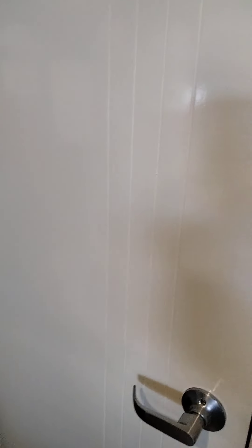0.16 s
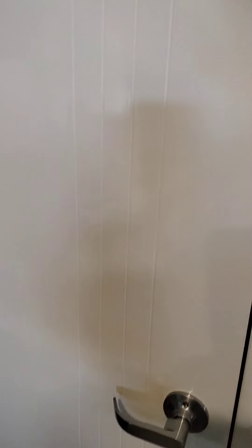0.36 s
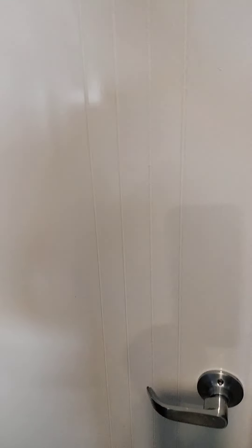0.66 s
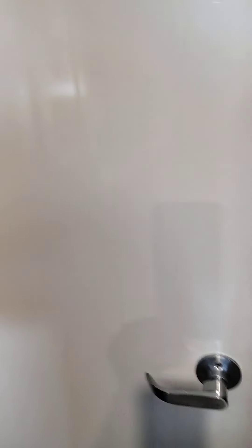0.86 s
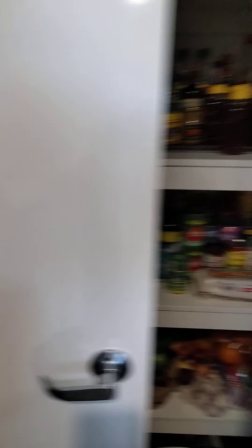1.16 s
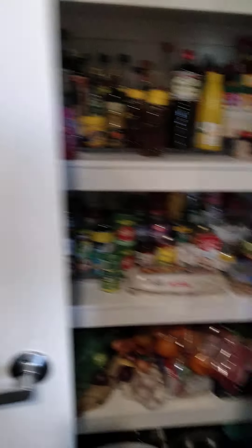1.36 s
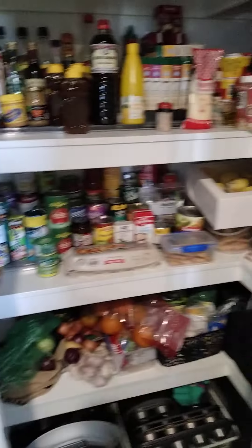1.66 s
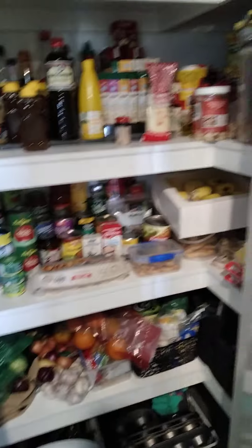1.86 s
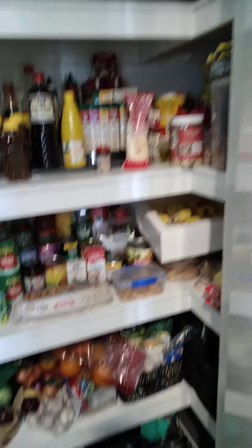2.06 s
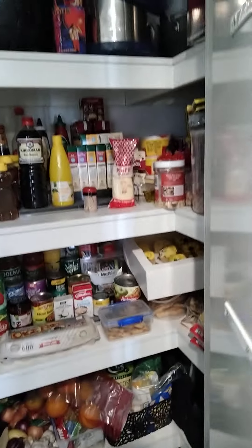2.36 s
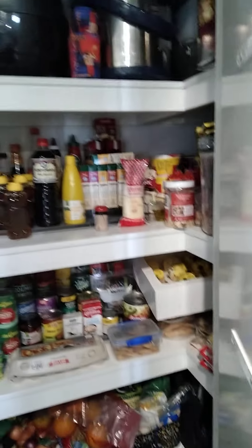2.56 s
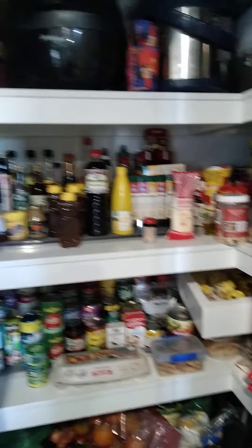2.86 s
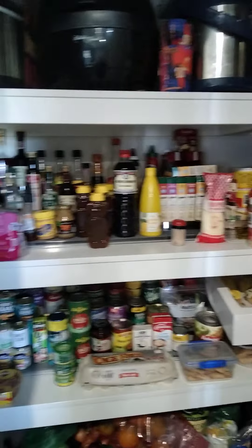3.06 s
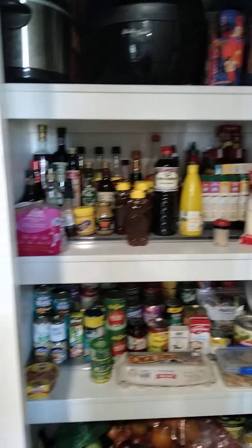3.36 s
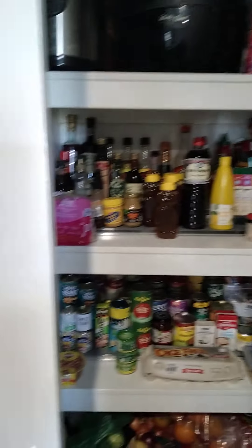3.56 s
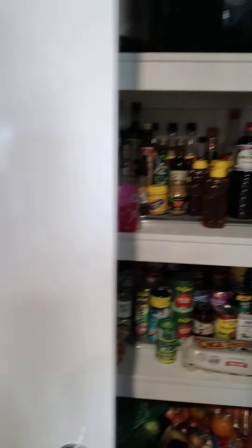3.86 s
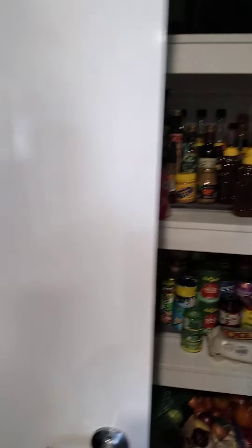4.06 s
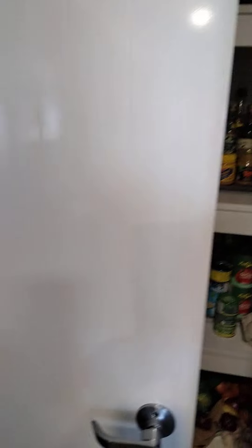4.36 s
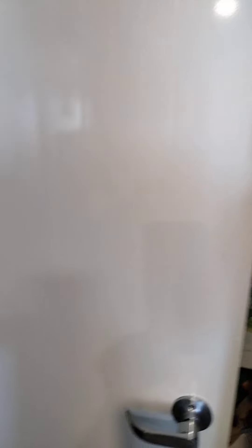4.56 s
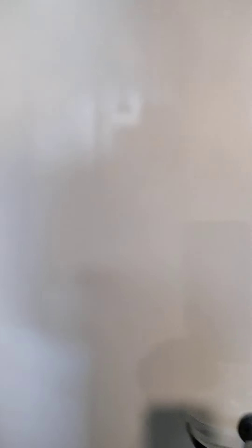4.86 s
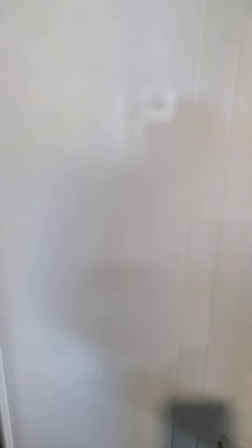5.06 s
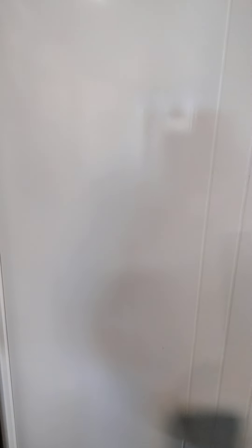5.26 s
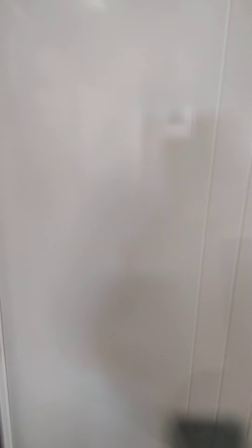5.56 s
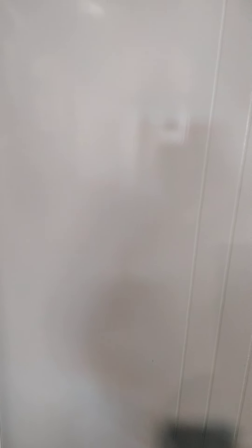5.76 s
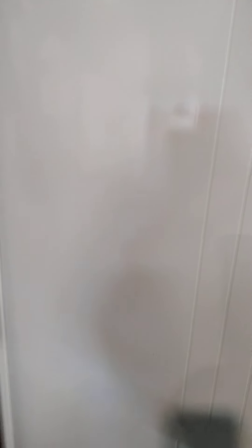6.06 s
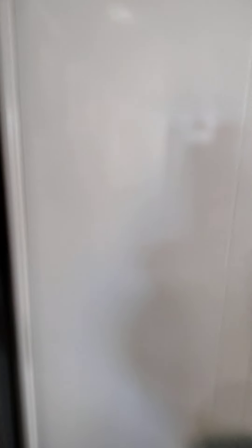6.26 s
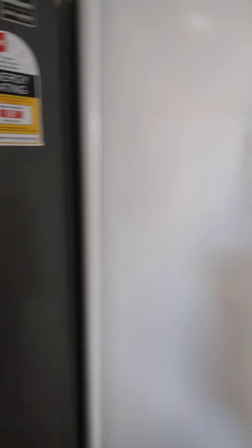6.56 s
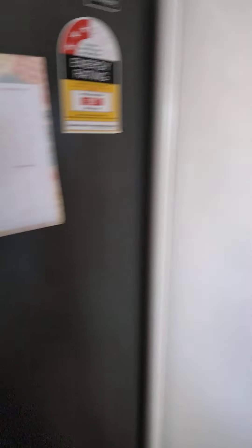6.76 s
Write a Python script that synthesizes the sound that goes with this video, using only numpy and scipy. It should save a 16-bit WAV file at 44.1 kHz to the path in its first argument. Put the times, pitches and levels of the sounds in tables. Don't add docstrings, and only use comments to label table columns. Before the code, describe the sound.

In a quiet, hard-walled kitchen a pantry door is opened: faint metal scraping, quick clicks, gritty short squeaks, a high chirp, a dull wooden bump and a light lever rattle. A calm middle holds isolated ticks, gusts on the microphone and a very low appliance throb. Later several crisp latch clicks lead to a harsh squeak and heavy shut, with a short bright echo and faint final ticks.

```python
import sys
import numpy as np
from scipy import signal
from scipy.fft import rfft, irfft
from scipy.io import wavfile
from scipy.ndimage import uniform_filter1d

SR = 44100
rng = np.random.default_rng(int(sys.argv[2]) if len(sys.argv) > 2 else 0)


def field_ratio(decibels):
    return 10 ** (np.asarray(decibels, dtype=float) / 20)


def pcm_store(signal):
    levels = np.round(np.clip(np.atleast_2d(signal), -1, 1) * 32767)
    wavfile.write(sys.argv[1], SR, levels.astype(np.int16).T)


N = 305172

# [start t/s, length t/s, first f/Hz, last f/Hz, top level/dB]
GRINDS = [
    (.231, 0.034, 3433, 3479, -43.5),
    (.262, 0.038, 3296, 3500, -42.5),
]
STIFF_GROANS = [
    (.303, 0.023, 2157, 2313, -35),
    (.321, .024, 2120, 2260, -32),
    (5.606, .012, 2104, 1999, -31),
]
RASPS = [
    (.524, .010, 1799, 1854, -26),
]
CATCH_RASPS = [
    (5.441, 0.0073, 1783, 1757, -40),
]
LEVER_GROANS = [
    (.345, .019, 2110, 2014, -31.5),
    (.363, .015, 1960, 1902, -26),
    (.377, .009, 1900, 1740, -29.5),
]
TURN_GROANS = [
    (.515, .012, 1876, 1998, -23.5),
    (.576, 0.01, 1983, 2060, -21),
]
SHUT_GROANS = [
    (6.053, 0.014, 2127, 2174, -11.5),
    (6.067, 0.009, 2121, 2184, -12.5),
    (6.076, 0.02, 2119, 2138, -13.5),
    (6.089, 0.009, 2135, 2208, -10),
]
CHIRPS = [
    (.610, .009, 7600, 8050, -8),
    (.618, .009, 8100, 8890, -9.5),
    (5.404, .008, 7790, 6900, -50.5),
    (5.412, 0.006, 7310, 6770, -41.5),
    (5.423, 0.010, 7200, 7685, -34),
    (5.432, .010, 7600, 7660, -32),
    (5.572, .017, 7515, 7600, -33),
    (6.098, 0.011, 7950, 8800, -8),
    (6.108, .007, 8800, 9400, -14),
]
CREAKS = [
    (.225, 0.076, 1145, 618, -59),
    (.378, 0.021, 1114, 764, -51.5),
    (2.335, 0.054, 505, 450, -76),
    (2.432, 0.024, 390, 364, -65),
]
SQUEALS = [
    (.582, .020, 4160, 4234, -10.5),
]
SQUEAL_ENDS = [
    (.600, 0.0081, 4206, 4614, -10.5),
]
LATCH_GROANS = [
    (5.762, .018, 2068, 2089, -21),
]
SPRING_NOTES = [
    (6.054, 0.012, 2128, 2146, -36.5),
    (6.058, 0.01, 4950, 5150, -28.5),
    (5.99, 0.012, 1400, 2130, -59),
]
DRAGS = [
    (.231, .03, 3150, 2800, -50),
    (.258, .047, 2786, 3250, -49),
]
PURE_NOTES = [(.322, 0.033, 6350, 6200, -37.5), (.348, 0.024, 6250, 6100, -33.5),
              (0.33, .011, 6900, 8400, -30), (.374, .009, 7200, 7400, -30), (.336, 0.013, 8900, 9500, -36),
              (0.61, 0.022, 7100, 7900, -17.5), (.6535, 0.0096, 7900, 8100, -22),
              (5.4415, 0.0066, 7650, 5500, -34.5), (5.48, 0.011, 7600, 7650, -37),
              (5.46, 0.01, 7600, 7100, -43), (5.5995, 0.0082, 10700, 13000, -38),
              (5.600, 0.0064, 6700, 6400, -37), (5.637, .006, 6250, 6500, -32.5),
              (6.055, .038, 2128, 2146, -27.5), (0.2, .06, 5600, 5450, -50), (.578, .006, 6200, 6600, -31),
              (.584, .022, 6300, 7000, -33), (.377, 0.0073, 5300, 6100, -34),
              (1.238, 0.0078, 2750, 2550, -60.5), (1.291, .012, 1560, 1700, -72),
              (1.345, .012, 1400, 1570, -76), (6.089, .008, 7500, 12900, -31),
              (.575, .006, 12000, 9500, -26)]
# [overtone levels from the fundamental up/dB, unsteadiness/0-1, start level/dB re top,
# end level/dB re top, place of the top/share of length]
GRIND = (-12.5, 0, -2, -6.5), 0.4, -1.5, -2.5, .27
STIFF_GROAN = (-8, -5, 3.5, -2.5, -2, -6.5), .35, -7, -1.5, .6
RASP = (-4.5, 4, -5.5, 7, 0.5, -3.5, -3), 0.63, -2, -4.5, .27
CATCH_RASP = (4, -1, -7.5, -14, 0.5, 2, -11.5), 0.5, -2, -7.5, 0.3
LEVER_GROAN = (-8, 0, -9, -2.5, -9.5, 1.5, -6.5), 0.3, -4, -3.5, .4
TURN_GROAN = (-8, 0, -3, 0, -9, 3, -9.5), 0.44, -8.5, -1, 0.5
SHUT_GROAN = (-21, -13, 4.5, -4, -9, -7.5, -19.5), 0.18, -8, -3, .75
CHIRP = (0, -19), .12, -6.5, -4.5, .6
CREAK = (0, -11, -9), 0.45, -5, -2, .27
SQUEAL = (-9, -2, -14.5), .06, -14, -1.5, 0.66
SQUEAL_END = (-4, -3, -13.5), .05, -5, -4, 0.4
LATCH_GROAN = (-7, -9, 4.5, -3.5, -8, -2, -19.5), 0.14, -5.5, -2, 0.78
SPRING_NOTE = (0,), 0.047, -8, -0.5, 0.43
DRAG = (0,), .55, -2, -4, .3
PURE_NOTE = (0,), .15, -4.5, -4, 0.38
SQUEAKS = [(GRINDS, GRIND), (STIFF_GROANS, STIFF_GROAN), (RASPS, RASP), (CATCH_RASPS, CATCH_RASP),
           (LEVER_GROANS, LEVER_GROAN), (TURN_GROANS, TURN_GROAN), (SHUT_GROANS, SHUT_GROAN),
           (CHIRPS, CHIRP), (CREAKS, CREAK), (SQUEALS, SQUEAL), (SQUEAL_ENDS, SQUEAL_END),
           (LATCH_GROANS, LATCH_GROAN), (SPRING_NOTES, SPRING_NOTE), (DRAGS, DRAG)]

# [start t/s, length t/s, first level/dB, last level/dB]
SCRAPES = [(0, .12, -63, -81), (.12, .11, -75.5, -57), (.232, .08, -48, -41.5), (.312, .078, -42.5, -32),
           (0.517, 0.051, -31, -47.5), (0.584, .034, -35, -38), (0.613, .017, -36.5, -31),
           (4.263, 0.044, -66, -74.5), (4.41, .074, -81.5, -70), (5.401, .046, -60.5, -50),
           (5.57, 0.073, -40, -51.5), (5.759, .02, -35.5, -32), (6.051, .059, -27, -39),
           (.85, .13, -56, -59.5), (5.425, .03, -53, -59)]
# [f/Hz, level/dB per Hz]
SCRAPE = [(240, -58.5), (400, -19), (1730, -37.5), (2020, -17), (3580, -11), (3810, -12), (5030, -10),
          (6240, 2), (11900, -11.5), (16000, -23.5)]

# [t/s, peak level/dB, ringing part f/Hz, treble share level/dB, decay t/ms]
CLICKS = [(0.2308, -34.5, 10400, -14, 3), (0.2980, -29.5, 7006, -19.5, 1.5),
          (0.3195, -26.5, 6850, -20, 1.5), (0.3370, -25.5, 6900, -20, 2), (0.3778, -15.5, 6500, -21.5, 1.2),
          (0.3820, -7.5, 7000, -12, 0.2), (0.5142, -10, 11700, -19, 1.34), (0.5747, -10, 8350, -14.5, 1.5),
          (0.5774, -16.5, 10990, -14.5, 3.3), (5.4160, -41.5, 10500, -5, 1.2),
          (5.4224, -31.5, 7700, -15.5, 4.5), (5.5700, -14, 10650, -7, 1.5), (5.5735, -26.5, 7500, -10, 4),
          (5.5875, -27, 10500, -12, 3), (5.6001, -19.5, 10600, -24, 1.5), (5.6161, -16.5, 5925, -20, 1.5),
          (5.6363, -16, 10600, -8, 2.2), (5.6400, -22.5, 10500, -11, 3), (5.7585, -10, 6200, -9.5, 1.5),
          (5.7765, -21.5, 8403, -12.5, 1.5), (5.99, -17.5, 6683, -7.5, 3.5),
          (6.0126, -31, 6190, -17.5, 3.3), (6.0505, -11, 6385, -9, 1.0), (6.068, -22, 11840, -2, 4),
          (6.110, -21.5, 10270, -2.5, 4.5)]
# [t/s, peak level/dB, ringing part f/Hz, wood share level/dB]
FUMBLES = [(0.0044, -46, 5945, -41), (0.0084, -39.5, 10500, -24.5), (0.027, -33.5, 7760, -40.5),
           (0.0513, -46.5, 8104, -33.5), (0.1312, -43.5, 7200, -14.5), (0.1454, -48.5, 5500, -14),
           (0.1554, -50, 5987, -13), (0.166, -47, 6640, -11), (0.1832, -45.5, 4327, -13.5),
           (0.191, -41, 6560, -20), (0.1946, -37, 6323, -32.5), (0.2005, -37, 7986, -16.5),
           (0.2168, -37.5, 6330, -28.5)]
# [t/s, peak level/dB, ringing part f/Hz, wood share level/dB, treble share level/dB]
SETTLES = [
    (1.2914, -72, 1560, 8.5, -25),
    (1.3451, -92, 1593, 6, -25),
    (6.663, -44, 6850, -23.5, -8.5),
    (6.6856, -51, 6310, -32, -5),
    (6.8267, -64, 6034, -19, -6),
]
# [f/Hz, level/dB per Hz]
TICK = [(2000, -9.5), (3500, -0.5), (5200, -3.5), (6500, 3), (8500, -8), (10000, -19)]
SPARK = [(8500, -9), (10600, 4.5), (13600, -6), (16000, -13)]
WOOD = [(500, -15), (900, 1.5), (1300, -4), (1900, 0), (2800, -17.5), (3500, -12)]

# [t/s, peak level/dB, ringing part f/Hz, treble share level/dB]
RATTLES = [(0.8530, -29.5, 6400, -18), (0.8618, -26.5, 6000, -13.5), (0.8723, -28, 7900, -12),
           (0.8910, -26, 6250, -10), (0.8955, -31.5, 6200, -23.5), (0.9075, -26, 6600, -15),
           (0.9150, -25.5, 6530, -16.5), (0.9260, -25, 6250, -12.5), (0.9320, -32, 6100, -24),
           (0.9405, -28, 6060, -18.5), (0.9520, -29, 6140, -22), (0.9580, -32.5, 6200, -24.5),
           (0.9660, -35, 6300, -25.5), (0.9770, -40.5, 6050, -26), (1.0008, -33.5, 6100, -24.5)]
# [f/Hz, level/dB per Hz]
SPARK_LOW = [(3800, -12.5), (5200, -3), (8000, 0.5), (10000, -3.5)]

# [t/s, peak level/dB, middle share level/dB, low share level/dB, treble share level/dB]
SNAPS = [
    (1.238, -53, 6, 0, -28.5),
    (1.4208, -34, -15, -17.5, -26),
    (2.4357, -39, -5.5, -4.5, -21),
    (2.5495, -48.5, -8.5, -3.5, -38),
    (4.086, -31, -26, -21.5, -34),
    (4.265, -49.5, -23.5, -17, 3),
    (4.484, -35, -23, -18.5, -25),
    (4.699, -63.5, -25.5, -19, -15.5),
]
# [f/Hz, width f/Hz, level/dB]; last four add low, low, middle, treble shares
SNAP_BANDS = [(5210, 2380, -1.0), (1740, 830, 13.0), (1100, 500, 11.5), (3100, 2070, 9.0), (10500, 1700, -1.0)]
# [f/Hz, width f/Hz, level/dB]
SNAP_RING = [(4180, 290, -10.5), (5040, 250, -15), (5560, 200, -0.5), (5840, 350, 0.5), (7600, 1300, -9)]

# [t/s, peak level/dB, thin panel share level/dB]
THUDS = [(0.382, -48, -9.5), (0.513, -32, -13.5), (0.573, -28, -13.5), (0.652, -19, -10),
         (0.69, -34.5, -10), (0.935, -34.5, -11), (5.403, -45.5, -18.5), (5.42, -40, -11), (5.569, -30, -5),
         (5.601, -29, -5.5), (5.635, -28.5, -7.5), (5.757, -27, -1), (5.988, -32.5, -1), (6.051, -27, -2),
         (6.111, -11, -15.5), (6.124, -21, -9), (6.145, -18.5, -38)]
# [f/Hz, level/dB, t60 t/s]
LEAF = [(55, -3, 0.29), (107, -1, 0.24), (159.86, -3.5, 0.39), (186, -1.5, 0.16)]
PANEL = [(252.2, -6, 0.069), (295, 0.5, 0.14), (343.9, -10, 0.19), (435, -8.5, 0.047)]
# [peak t/s, sway f/Hz, level/dB, fade level/dB per s]
THROB = [
    (0.519, 27, -49, 90),
    (.735, 24.5, -24.5, 94),
    (1.1, 24, -47, 69.5),
    (5.53, 19, -46, 90),
    (5.815, 20, -40, 168),
    (6.175, 50, -33, 170),
    (6.235, 22, -30, 107),
    (6.494, 18.2, -45.5, 91),
    (6.53, 41, -51.5, 70),
]
# [peak t/s, level/dB, share above 200 Hz level/dB]
RUMBLE = [(.28, -66.5, 3.5), (.412, -58.5, -10), (.53, -53.5, -14), (0.691, -35.5, -6.5),
          (0.999, -49, -9.5), (1.4, -65, -4), (5.426, -58, -12), (5.582, -44.5, -14), (5.786, -43.5, -6.5),
          (6.144, -33, -7), (6.421, -58, -23)]
# [f/Hz, level/dB per Hz]
LOW = [(30, -4), (60, -2.5), (110, -1), (170, -4.5), (220, -16)]
UPPER = [(200, -2.0), (300, 5.5), (480, -6.0), (900, -14.5)]

# [f/Hz, t60 t/s]
KITCHEN = [(100, 0.42), (500, 1.2), (2000, 1.015), (4000, 0.72), (6500, 0.68), (9000, 0.59), (13000, 0.42)]
# [delay t/s, level/dB]
WALLS = [
    (.0215, -11.5),
    (.043, -17),
]

# [t/s, peak level/dB,
# top f/Hz]
PUFFS = [(1.65, -43, 70.2), (1.715, -39.5, 107), (1.80, -44.5, 66.4), (1.859, -46, 58.5),
         (1.912, -39, 59.7), (1.991, -39.5, 57), (2.047, -33, 190), (2.07, -35, 95), (2.122, -48, 71),
         (2.229, -44.5, 63.2), (5.396, -44, 90), (5.40, -40, 41.8), (5.45, -46, 55), (5.58, -35, 70),
         (5.66, -41, 60), (5.77, -36, 71), (5.85, -40.5, 55), (6.21, -31, 50)]
# [peak t/s, level/dB, fade level/dB per s]
RUSTLE = [
    (0, -65, 96),
    (.56, -51, 34.5),
    (6.151, -51, 76),
]
# [t/s, level/dB]
HUM = [(0, -67), (.5, -56), (1.2, -49.5), (1.6, -49.5), (3, -52), (4.75, -51), (5.15, -54), (5.35, -64),
       (6.92, -63)]
# [t/s, level/dB]
STILL = [(0.4, -102), (1.6, -78.5), (3.29, -79), (4.51, -72), (5.7, -74.5), (6.92, -76)]
# [f/Hz, level/dB per Hz]
HUSH = [(200, 0.5), (400, -7), (800, -8.5), (1300, -14.5), (2200, -19.5), (4000, -32.5)]
DRONE = [(30, -2), (50, 0.5), (80, 0), (140, -4), (200, -8.5), (400, -22.5)]
HISS = [(1500, -4.5), (3600, -4.5), (6300, 2), (8000, -3.5), (11000, -2.5), (12500, -3), (13300, -13.5)]
# [f/Hz, level/dB]
WHINE = [(445, -89), (4980, -100), (7994, -99), (8096, -94.5)]


def evened(x):
    return x / np.sqrt(np.mean(x ** 2) + 1e-20)


def read(points, hz):
    f, value = np.transpose(points)
    return np.interp(np.log(hz + 1), np.log(f + 1), value)


def level_at(rows, t):
    s, db = np.transpose(rows)
    return np.interp(t, s, db)


def add(mix, s, sound):
    part = mix[round(s * SR):][:len(sound)]
    part += sound[:len(part)]


def noise(spectrum, size=N):
    hz = np.fft.rfftfreq(size, 1 / SR)
    inside = (hz >= spectrum[0][0]) & (hz <= spectrum[-1][0])
    white = rfft(rng.standard_normal(size))
    return evened(irfft(white * field_ratio(read(spectrum, hz)) * inside, size))


def ring(x, hz, width_hz):
    r = np.exp(-np.pi * width_hz / SR)
    pole = r * np.exp(2j * np.pi * min(hz, SR / 2.2) / SR)
    return 2 * signal.lfilter([1 - r], [1, -pole], x).real


def swell(t, s, db, rise_db, fade_db):
    return field_ratio(db - np.where(t < s, rise_db * (s - t), fade_db * (t - s)))


def squeak(length, first_hz, last_hz, top_db, overtones_db, unsteady, start_db, end_db, top_at):
    done = np.linspace(0, 1, round(length * SR))
    hz = first_hz + (last_hz - first_hz) * done ** 1.2
    db = top_db + np.interp(done, [0, np.clip(top_at, .05, .95), 1], [start_db, 0, end_db])
    wobble = uniform_filter1d(rng.standard_normal((8, 4096)), 50, axis=1)[:, :len(done)] * np.sqrt(50)
    turns = np.cumsum(hz * (1 + 0.083 * unsteady * wobble[0])) / SR
    lag = rng.random(8)
    tone = 0
    for k, overtone_db in enumerate(overtones_db, 1):
        force = field_ratio(overtone_db) * (1 + 0.67 * unsteady * wobble[k])
        tone = tone + force * np.cos(2 * np.pi * (k * turns + lag[k])) * (k * hz < SR / 2)
    return field_ratio(db) * evened(tone) * signal.windows.tukey(len(done), min(1, 130 / len(done)))


def scrape(length, first_db, last_db):
    force_db = np.linspace(first_db, last_db, round(length * SR))
    jumps = evened(uniform_filter1d(rng.standard_normal(20000), 60))
    grit_db = 5 * np.clip(jumps, -3, 2)[:len(force_db)]
    return field_ratio(force_db + grit_db) * noise(SCRAPE, size=20000)[:len(force_db)]


def click(db, hz, wood_db, treble_db, ms):
    t = np.arange(1024) / SR
    fade = np.exp(-t * 1000 / max(ms, .2)) * np.minimum(1, t / 0.00012)
    part = evened(ring(rng.standard_normal(len(t)), hz, 799.4))
    sparkle = field_ratio(treble_db + 6.5) * noise(SPARK, size=1024)
    metal = noise(TICK, size=1024) + sparkle + .8 * part
    wood = field_ratio(wood_db + 5.5) * noise(WOOD, size=1024) * fade ** 0.34
    return field_ratio(db - 10.5) * (metal * fade + wood)


def rattle(db, hz, treble_db):
    t = np.arange(1024) / SR
    knock = rng.standard_normal(len(t)) * np.exp(-t / 0.0022)
    lever = ring(knock, hz, 630)
    edge = noise(SPARK_LOW, size=1024) * np.exp(-t / 0.0031)
    spark = noise(SPARK, size=1024) * np.exp(-t / 0.0016)
    return field_ratio(db) * (lever / abs(lever).max() + field_ratio(-13) * edge + field_ratio(treble_db) * spark)


def snap(db, middle_db, low_db, treble_db, ms):
    t = np.arange(4096) / SR
    crack = 0.12 * rng.standard_normal(len(t)) * np.exp(-t * 1000 / max(ms, .1))
    crack[0] = 1
    parts = []
    for (hz, width, band_db), share_db in zip(SNAP_BANDS, (0, low_db, low_db, middle_db, treble_db)):
        part = ring(ring(crack, hz, 1.25 * width), hz, 1.74 * width)
        parts.append(field_ratio(band_db + share_db) * ring(part, hz, 2.5 * width))
    shake = rng.standard_normal(len(t))
    buzz = evened(sum(field_ratio(ring_db) * ring(ring(shake, hz, width), hz, 2 * width)
                      for hz, width, ring_db in SNAP_RING))
    buzz *= np.exp(-t / 0.016) * np.hanning(2 * len(t))[len(t):]
    sound = sum(parts) + field_ratio(-21) * abs(parts[0]).max() * buzz
    return field_ratio(db) * sound / abs(sound).max()


def thud(db, panel_db):
    t = np.arange(12000) / SR
    modes = LEAF + [(hz, d + panel_db + 9.5, t60) for hz, d, t60 in PANEL]
    door = np.zeros(len(t))
    for hz, mode_db, t60 in modes:
        level_luck, pitch_luck = rng.standard_normal(2)
        fade = field_ratio(mode_db + 2 * level_luck - 60 * t / t60)
        door += fade * np.sin(2 * np.pi * hz * (1 + 0.057 * pitch_luck) * t)
    door *= 1 - np.exp(-t / 0.0018)
    return field_ratio(db - 5.5) * door / abs(door).max()


def pumped_air(t):
    return sum(swell(t, s, db + 2.0, 129.5, fade_db) * np.cos(2 * np.pi * hz * (t - s))
               for s, hz, db, fade_db in THROB)


def door_rumble(t):
    low, upper = noise(LOW), noise(UPPER)
    return sum(swell(t, s, db, 249.5, 105.5) * (low + field_ratio(upper_db) * upper) for s, db, upper_db in RUMBLE)


def kitchen():
    taps = np.zeros(SR)
    at = np.arange(260, SR - 12, 12)
    taps[at + rng.integers(0, 12, len(at))] = rng.choice([-1., 1.], len(at))
    hz, t, z = signal.stft(taps, SR, nperseg=256)
    early = 1 + 1.2 * np.exp(-t / 0.011)
    decay = field_ratio(-60 * t / read(KITCHEN, hz)[:, None])
    tail = signal.istft(z * early * decay, SR, nperseg=256)[1]
    tail = tail / np.linalg.norm(tail)
    for s, db in WALLS:
        add(tail, s, field_ratio([db]))
    return tail


def shuffled(echo):
    z = signal.stft(echo, nperseg=256, noverlap=192)[2]
    patches = rng.standard_normal(z.T.shape).T
    patches = evened(uniform_filter1d(uniform_filter1d(patches, size=3, axis=0), size=5, axis=1))
    return signal.istft(z * field_ratio(3.0 * patches - 0.82), nperseg=256, noverlap=192)[1][:N]


def puff(db, top_hz):
    ms = 1000 * 1.41 / top_hz
    t = np.arange(8192) / SR * 1000 / max(ms, 5)
    spectrum = [(20, -3), (top_hz / 2, 0), (top_hz, -6), (3 * top_hz, -36)]
    lump = noise(spectrum, size=8192) * (t * np.exp(1 - t)) ** 2
    return field_ratio(db) * lump / abs(lump).max()


def appliance(t):
    return field_ratio(level_at(HUM, t)) * np.sin(2 * np.pi * 20.85 * t)


def house(t):
    stirred = sum(swell(t, s, db, 200.5, fade_db) for s, db, fade_db in RUSTLE)
    hush = (field_ratio(level_at(STILL, t)) + stirred) * noise(HUSH)
    drift = uniform_filter1d(rng.standard_normal((len(WHINE), N)), 4000, axis=1) * np.sqrt(4000)
    whine = sum(field_ratio(db + 3.3 * d) * np.sin(2 * np.pi * hz * t) for (hz, db), d in zip(WHINE, drift))
    return hush + field_ratio(-67.5) * noise(DRONE) + field_ratio(-82) * noise(HISS) + whine


def scene():
    latch, notes, ticks, lever, snaps, cracks, door, puffs = np.zeros((8, N))
    for rows, kind in SQUEAKS:
        for s, *slip in rows:
            add(latch, s, squeak(*slip, *kind))
    for s, *rub in SCRAPES:
        add(latch, s, scrape(*rub))
    for s, *slip in PURE_NOTES:
        add(notes, s, squeak(*slip, *PURE_NOTE))
    for s, db, hz, *spark in CLICKS:
        add(ticks, s, click(db, hz, -18.5, *spark))
    for s, *blow in FUMBLES:
        add(ticks, s, click(*blow, treble_db=-15.5, ms=4.1))
    for s, *blow in SETTLES:
        add(ticks, s, click(*blow, ms=2))
    for s, *knock in RATTLES:
        add(lever, s, rattle(*knock))
    for s, *blow in SNAPS:
        add(snaps, s, snap(*blow, ms=11.5))
        add(cracks, s, snap(*blow, ms=0.074))
    for s, *blow in THUDS:
        add(door, s, thud(*blow))
    for s, *gust in PUFFS:
        add(puffs, s, puff(*gust))
    far = field_ratio(-4.5) * latch + field_ratio(-12) * notes + field_ratio(-3.0) * ticks + field_ratio(-10.5) * lever
    far += field_ratio(-2.0) * cracks + field_ratio(-9.0) * door
    echo = shuffled(signal.fftconvolve(far, kitchen())[:N])
    t = np.arange(N) / SR
    around = pumped_air(t) + door_rumble(t) + appliance(t) + house(t)
    return (latch + notes + ticks + lever + snaps + door + echo + puffs + around)[None]


def band_limit(x):
    return signal.sosfilt(signal.butter(12, 15000, fs=SR, output="sos"), x)


def record(dry):
    power_db = 10 * np.log10(abs(uniform_filter1d(dry[0] ** 2, 300)) + 1e-12)
    fall = np.arange(N) * 60. / SR
    held_peak_db = np.maximum.accumulate(power_db + fall) - fall
    over_db = np.maximum(held_peak_db + 16.5, 0)
    held = dry / field_ratio(0.59 * uniform_filter1d(over_db, 200))
    mix = signal.oaconvolve(held, signal.firwin(255, 16200, fs=SR)[None], "same")
    return band_limit(mix)


dry = scene()
out = record(dry)
pcm_store(out)
```